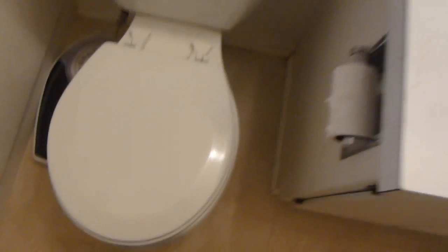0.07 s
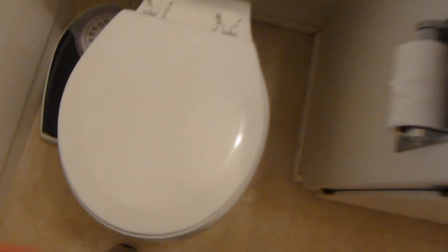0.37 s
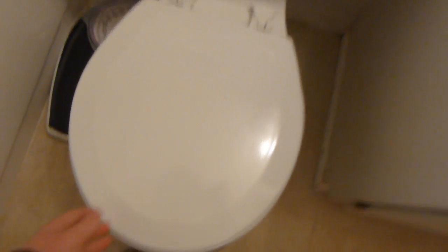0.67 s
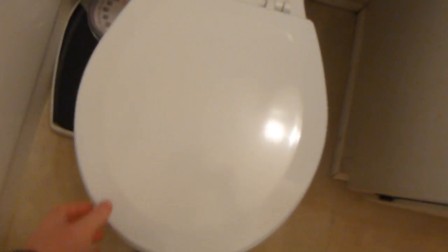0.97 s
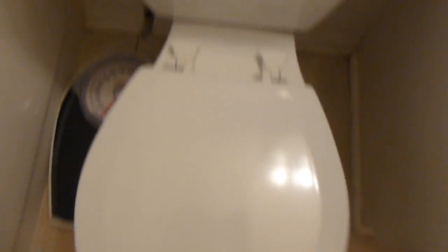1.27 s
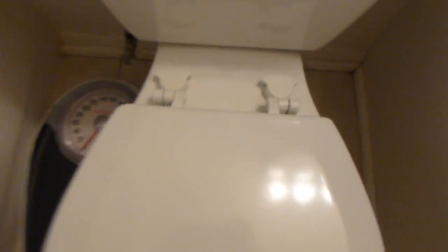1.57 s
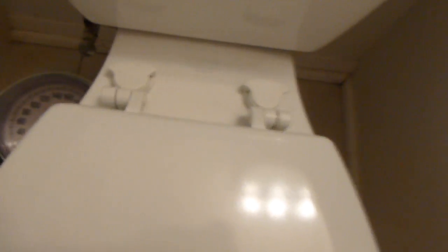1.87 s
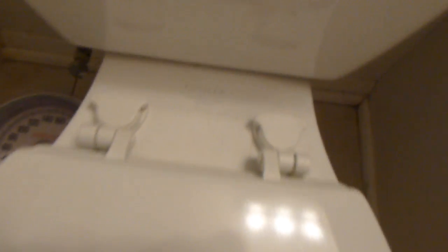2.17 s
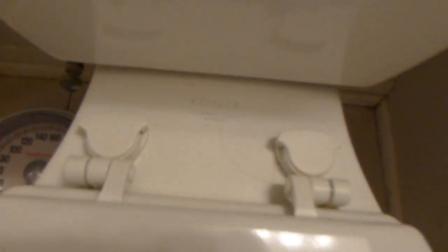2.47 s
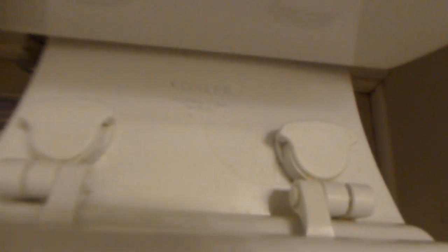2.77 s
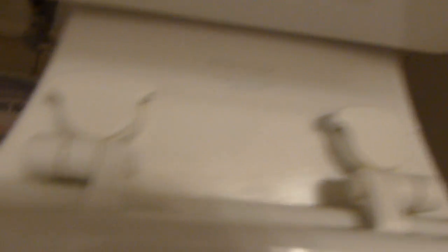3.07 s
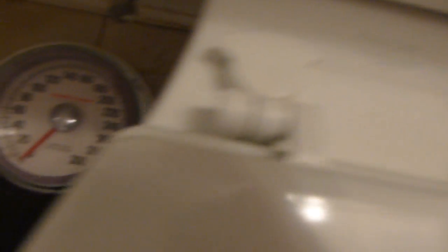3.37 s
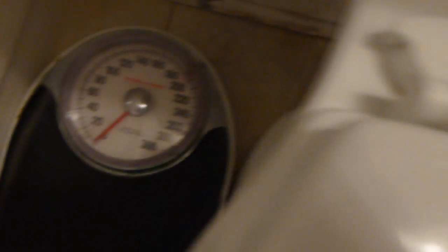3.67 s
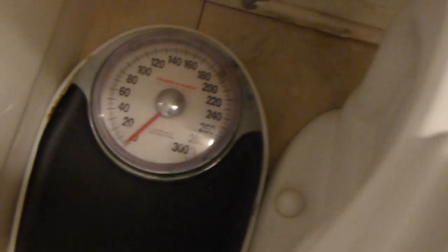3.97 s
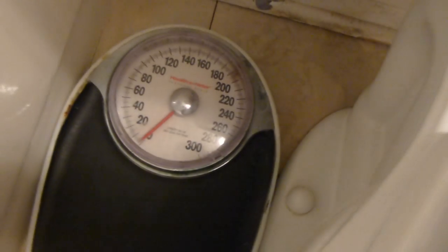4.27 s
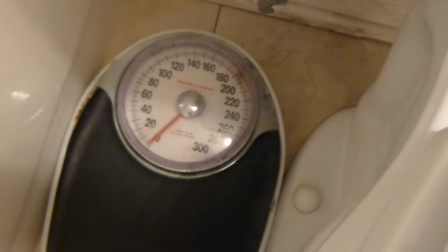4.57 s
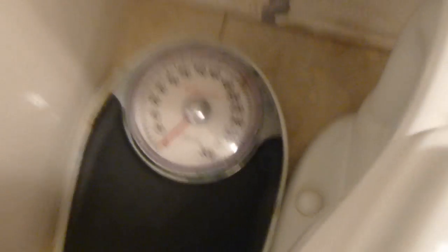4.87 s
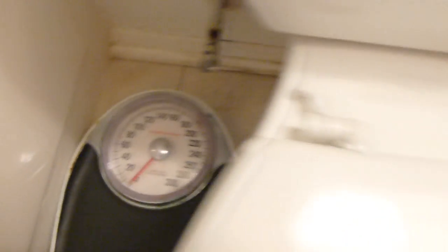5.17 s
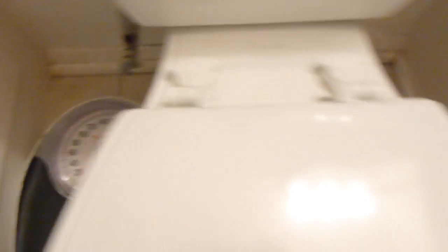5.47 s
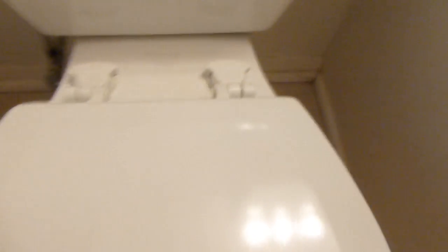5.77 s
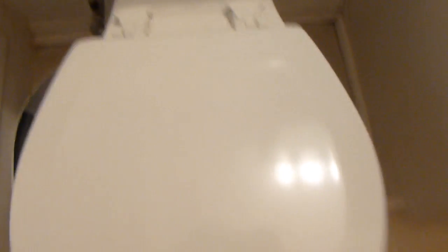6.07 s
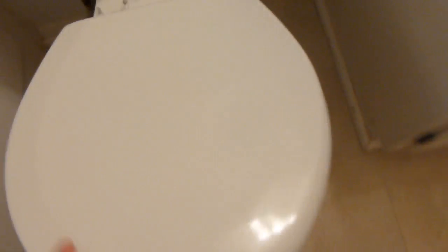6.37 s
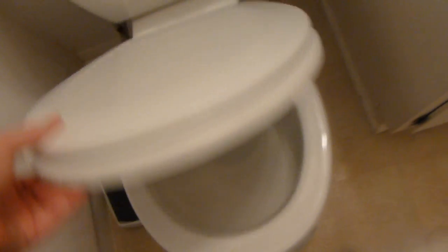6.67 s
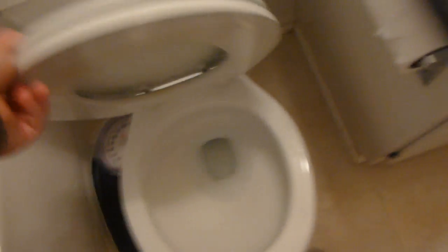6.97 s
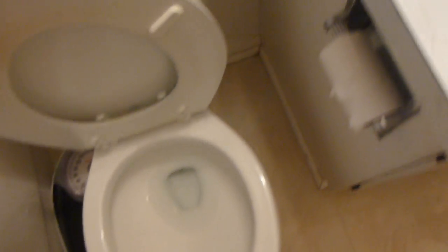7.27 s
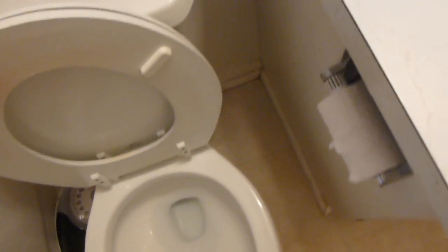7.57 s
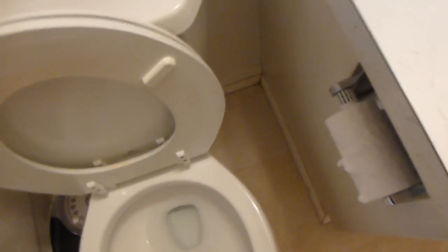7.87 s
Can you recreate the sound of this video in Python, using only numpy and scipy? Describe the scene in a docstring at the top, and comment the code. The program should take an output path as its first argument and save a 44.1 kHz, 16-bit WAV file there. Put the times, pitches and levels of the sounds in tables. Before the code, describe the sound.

After a brief silence, a faint low room noise and the close, soft rustle of a jacket begin at about 0.4 seconds. The cloth swells and fades throughout as someone moves around a small bathroom. Near 0.9 seconds a soft footstep thuds and faintly shakes the spring of a floor scale. Light bumps and small ticks follow between 1.3 and 2 seconds, then a faint step and tick near 3.1 seconds, and quiet rustling. A firmer, dull footfall lands at about 5.7 seconds. At 6.2 seconds the toilet seat and lid jolt in their hinges with a sharp, hollow, very quick double clack. More rustling and soft bumps follow as they swing up. At about 7.6 seconds the lid knocks hard against the china tank, by far the loudest sound, and tank and room ring for half a second. A faint tick and bump come near 8 seconds.

```python
"""Someone moves about a small bathroom, jacket rustling, with soft footfalls and small bumps.
Near 1 s a firm step shakes the spring of a floor scale; the cloth rustles on and off throughout.
At 6.2 s a hand picks up the toilet seat and lid together, which clack on their hinges.
They swing back, and at 7.6 s the lid knocks hard against the china tank and the room rings."""
import sys
import numpy as np
from scipy import signal
from scipy.fft import rfft, irfft, next_fast_len
from scipy.io import wavfile

SR = 44100
rng = np.random.default_rng(int(sys.argv[2]) if len(sys.argv) > 2 else 0)


def persist_wave(psi):
    """Save psi, clipped to +-1, as 16-bit WAV."""
    counts = np.round(np.clip(psi, -1, 1) * 32767).astype(np.int16)
    wavfile.write(sys.argv[1], SR, np.atleast_2d(counts).T)


N = 353241
TIME = np.arange(N) / SR

# Levels in a table are relative. A "fade" or "t60" is the time a sound takes to drop by 60 dB.
# Tone colour (how strong each pitch is) of the lid's first touch: f/Hz, level/dB
CRACK_COLOUR = [(60, -10), (500, 7), (2000, 0), (4500, 5), (7000, -11), (9300, -4.5), (15000, -34)]
# Short-lived tones of the lid: f/Hz, level/dB, fade/s
LID_TONES = [(275, -18, 0.037), (550, -3.5, 0.071), (660, -9.5, 0.059), (890, -6, 0.15), (1180, -10, 0.017),
             (1333, -8.5, 0.16), (1783, -6, 0.05), (2380, -15.5, 0.013), (2920, -31, 0.0091),
             (4080, -12.5, 0.017), (4900, -25, 0.022)]
# Long-ringing tones of tank, bowl and room: f/Hz, level/dB, fade/s
TANK_TONES = [(108, -39, .5), (205, -34, .45), (250, -35, .4), (285, -35, .4), (414, -26, .48),
              (457, -23, .44), (497, -28, .44), (533, -28, .44), (560, -26, .46), (586, -27, .48),
              (635, -29, .4), (671, -26, .48), (867, -23, .55), (887, -25, .44), (960, -21, .42),
              (969, -16, .44), (1060, -29, .44), (1092, -26, .44), (1109, -25, .44), (1282, -30, .44),
              (1346, -26, .42), (1585, -29, .4), (1626, -28, .38), (1790, -29, .4), (1943, -28, .3),
              (2026, -30, .38), (2260, -34, .4), (2907, -35, .36), (3375, -39, .4), (4040, -41, .44)]
# Colour of the knock's echo: f/Hz, level/dB
KNOCK_ECHO_COLOUR = [(70, -18), (110, -21), (220, -10), (360, -12), (540, -1), (770, -10), (930, 4),
                     (1350, -6.5), (1480, -7.5), (1850, -0.5), (2500, -18.5), (4300, -19), (6500, -33.5),
                     (12000, -60)]
# First bounces of the sound off tank, cabinet and wall: delay/s, level/dB
BOUNCES = [(.0042, -9), (0.0105, -6), (0.0146, -13)]
def lid_knock(touch_s=7.5684):
    """The lid hits the tank: a crack, the lid's own thud, then china and room ring on."""
    out = np.zeros((2, N))
    thud_s = touch_s + 0.00069   # the push is hardest just after the first touch
    crack = from_db(-12) * fade(0.013) * noise(CRACK_COLOUR, ROOM_LIKENESS, size=SR)
    lid = ring(LID_TONES)
    tank = from_db(10.5) * ring(TANK_TONES) * build_up(0.03)
    room = from_db(-8.5) * echo(KNOCK_ECHO_COLOUR, build_s=0.0033, stretch=1.0)
    add(out, touch_s, crack)
    add(out, thud_s, lid + tank + room)
    for delay_s, db in BOUNCES:
        add(out, thud_s + delay_s, from_db(db) * lid)
    return out * from_db([[.4], [-.4]])   # a little louder on the left


# Two clacks as the seat is lifted: t/s, ring level/dB, snap level/dB, echo level/dB
SEAT_CLACKS = [(6.2084, -7, -22, -33), (6.2248, -1, -23, -31)]
# Tones of the seat: f/Hz, level/dB, fade/s
SEAT_TONES = [(250.5, -27.5, 0.36), (419, -39, 0.23), (672, -43, .25), (1089, -38.5, 0.42),
              (1565, -36, 0.27), (1953, -41, 0.25), (2922, -36, 0.2), (3040, -28, 0.2), (3020, -47, .2),
              (3380, -50, 0.17), (3820, -26, 0.032)]
# Colours of the snap and of its echo: f/Hz, level/dB
SNAP_COLOUR = [(200, -5), (1000, -16), (2200, -6), (3000, -1), (4100, 1), (5500, -3), (7500, -9),
               (9800, -7), (15000, -10)]
SNAP_ECHO_COLOUR = [(70, -34), (150, -1), (400, -5), (1100, -1.5), (2100, -0.5), (3100, 6), (4300, 0),
                    (7000, -10), (9800, -0.5), (15000, -15)]
def seat_clacks():
    """Seat and lid jolt in their loose hinges: a sharp snap and a hollow ring."""
    out = np.zeros((2, N))
    for s, ring_db, snap_db, echo_db in SEAT_CLACKS:
        add(out, s, from_db(ring_db) * ring(SEAT_TONES))
        add(out, s, from_db(snap_db) * fade(0.021) * noise(SNAP_COLOUR, ROOM_LIKENESS, size=SR))
        add(out, s, from_db(echo_db) * echo(SNAP_ECHO_COLOUR, build_s=0.0044, stretch=0.94))
    return out


# Colours of the cloth's hiss, the folds' swish and the body's rumble: f/Hz, level/dB
HISS_COLOUR = [(1500, -12.5), (3200, -5), (3700, -4), (4120, 1), (4450, -3.5), (4900, 1.5), (6000, -1.5),
               (9500, -1.5), (13000, -4.5), (15500, -10.5)]
SWISH_COLOUR = [(100, -35), (350, -16), (750, 0), (1100, 1), (1700, 2), (2080, 1.5), (2400, -1.5),
                (2700, -0.5), (3300, -5), (5000, -11.5), (9000, -19.5)]
RUMBLE_COLOUR = [(60, -24), (100, -21), (140, -9.5), (300, -1.5), (400, 0.5), (480, 0), (620, -1.5),
                 (780, -0.5), (1100, -9.5), (3000, -32)]
# How alike left and right are for rustle and background: f/Hz, likeness (0 to 1)
CLOTH_LIKENESS = [(100, 0.74), (300, 0.57), (700, 0.24), (1400, 0.27), (3100, 0.64), (7000, 0.66),
                  (15000, 0.49)]
def jacket():
    """Countless tiny slips of cloth blur into a hiss; folds and body add the lower sounds."""
    sliding, folding, body = movements()
    hiss = from_db(2) * sliding * waver(depth_db=0.47, per_s=18)
    hiss = hiss * near_walls(noise(HISS_COLOUR, CLOTH_LIKENESS, size=N), echo_db=-9)
    swish = from_db(2.45) * folding * waver(depth_db=0.4, per_s=14)
    swish = swish * near_walls(noise(SWISH_COLOUR, CLOTH_LIKENESS, size=N), echo_db=-4.5)
    rumble = from_db(3) * body * waver(depth_db=1.16, per_s=28)
    rumble = rumble * noise(RUMBLE_COLOUR, CLOTH_LIKENESS, size=N)
    return hiss + swish + rumble


# The wearer bends, leans, straightens up, lifts the lid and lets it go:
# fastest at t/s, rise/s, fall/s, hiss level/dB, swish above hiss/dB, rumble above hiss/dB
MOVES = [ (.50, 0.2, 0.28, -40, -4, -11.5), (.98, 0.08, 0.14, -52, -3, -8),
         (1.46, .22, 0.28, -44, -4, -15.5), (1.75, 0.068, 0.41, -45, -4.5, -11.5),
         (2.99, 0.72, 0.23, -50.5, -10.5, -10), (3.23, 0.055, .06, -45.5, -10, -19),
         (3.45, .22, 0.38, -46.5, -9, -12.5), (4.069, 0.18, 0.093, -50.5, -9, -15.5),
         (4.30, 0.042, 0.19, -55, -2, -13), (4.64, 0.062, 0.058, -50, -6, -22),
         (4.96, 0.053, .04, -50, -5, -20), (5.04, .09, 0.59, -49.5, -8, -17.5),
         (5.73, 0.048, 0.075, -48, -0.5, -8), (5.98, 0.33, 0.51, -48.5, -3, -4.5),
         (6.48, 0.22, 0.18, -41, -5, -16.5), (6.759, 0.096, 0.15, -50.5, -3, -4),
         (6.98, 0.084, 0.28, -43.5, -3, -15), (7.24, .055, 0.062, -51.5, -3, 7),
         (7.475, 0.044, 0.14, -44.5, -1, -4), (8.00, 0.24, .14, -55.5, -4, -7)]
def movements():
    """How strong hiss, swish and rumble are over time: each move swells and dies away."""
    power = from_db([[-59.5], [-71], [-65.5]]) ** 2   # the faint rustle between moves
    for s, rise_s, fall_s, db, folds_db, body_db in MOVES:
        width_s = np.where(TIME < s, rise_s, fall_s)
        swell = np.exp(-((TIME - s) / width_s) ** 2)
        power = power + swell * from_db([[db], [db + folds_db], [db + body_db]]) ** 2
    return np.sqrt(power)


def waver(depth_db, per_s):
    """Loudness that wanders at random, as cloth catches and slips."""
    points = rng.standard_normal(1000)
    return from_db(depth_db * np.interp(TIME * per_s, np.arange(len(points)), points))


# Footfalls, duller when the press lasts longer: t/s, level/dB, press/s
FOOTFALLS = [(0.831, -41.5, 0.0022), (0.910, -34.5, 0.0018), (3.150, -40, 0.0053), (5.700, -38.5, 0.0052),
             (5.754, -27.5, 0.0054)]
# Tones of the floor and of the scale's spring: f/Hz, level/dB, fade/s
FLOOR_TONES = [(145.3, -6.5, 0.27), (200, -3, 0.049), (256.5, 1, 0.19), (318, -4, .08)]
SPRING_TONES = [(797, -53, .7), (1416, -49, .3), (1596, -38, .33), (1612, -45, .3)]
def footfalls():
    """A soft sole presses on the floor, which thuds; the second step shakes the scale."""
    out, thud = np.zeros((2, N)), ring(FLOOR_TONES)
    for s, db, press_s in FOOTFALLS:
        press = np.sin(np.pi * np.minimum(TIME[:SR] / press_s, 1)) ** 2
        add(out, s, from_db(db) * signal.fftconvolve(thud, press / press.sum())[:SR])
    add(out, FOOTFALLS[1][0], ring(SPRING_TONES) * build_up(0.046))
    return out


# Soft bumps and scuffs: t/s, level/dB, middle f/Hz, swell/s, fade/s
BUMPS = [(0.672, -39, 970, 0.012, 0.27), (0.930, -48, 290, 0.012, 0.35), (1.5, -37.5, 457, 0.0026, 0.14),
         (1.521, -44, 480, .003, 0.45), (3.330, -54, 510, 0.16, 1), (5.752, -42, 240, .012, 0.38),
         (5.756, -46, 900, 0.011, 0.54), (7.180, -48, 150, 0.027, .55), (7.415, -46, 460, 0.019, 0.34),
         (7.971, -43.5, 417, 0.012, .4)]
def bumps():
    """Soft bumps swell, then die away in the room."""
    out = np.zeros((2, N))
    for s, db, hz, swell_s, t60 in BUMPS:
        rise = np.minimum(TIME[:SR] / swell_s, 1)
        fall = np.minimum(fade(t60) * 1000 ** (swell_s / t60), 1)   # starts once the rise is over
        scuff = noise(hump(hz, edge_db=-19.5), ROOM_LIKENESS, size=SR)
        add(out, s, from_db(db) * rise * fall * scuff)
    return out


# Small ticks: t/s, level/dB, middle f/Hz
SMALL_TICKS = [(1.310, -44.5, 1400), (1.657, -41.5, 1670), (1.988, -43, 1490), (3.146, -43.5, 4100),
               (4.273, -54, 1893), (4.926, -51, 1900), (7.892, -52, 4000)]
def ticks():
    """Jacket and hinges give short ticks, each with a faint echo."""
    out = np.zeros((2, N))
    shape = fade(0.034) + from_db(-9) * fade(0.46)
    for s, db, hz in SMALL_TICKS:
        add(out, s, from_db(db) * shape * noise(hump(hz, edge_db=-16), ROOM_LIKENESS, size=SR))
    return out


# How long the room rings: f/Hz, fade/s
ROOM_FADE = [(100, 0.56), (400, 0.59), (1000, 0.61), (2000, 0.4), (4500, 0.47), (8000, 0.45), (15000, 0.16)]
# How alike left and right are for sound scattered by the room: f/Hz, likeness (0 to 1)
ROOM_LIKENESS = [(100, 0.89), (350, 1), (700, 0.95), (1400, 0.62), (4000, 0.77), (12000, 0.66)]
def echo(colour, build_s, stretch):
    """Bounces off the walls pile up quickly, then each octave dies at its own pace."""
    wash = rfft(noise(colour, ROOM_LIKENESS, size=SR))
    hz = np.fft.rfftfreq(SR, 1 / SR)
    octaves_hz = 125 * 2. ** np.arange(8)
    out = 0
    for centre, share in zip(octaves_hz, np.eye(len(octaves_hz))):
        band = irfft(wash * at_hz(np.c_[octaves_hz, share], hz), SR)
        out = out + band * fade(stretch * at_hz(ROOM_FADE, centre))
    return out * build_up(build_s)


def near_walls(x, echo_db, pieces=32):
    """Close, hard walls boost some pitches, and these shift as the wearer moves; power 1."""
    out, hop = np.zeros((2, N)), N // pieces
    for start in range(0, N - hop, hop):
        piece = x[:, start:start + 2 * hop]
        piece = piece * np.hanning(2 * hop)[:piece.shape[1]]
        paths = rng.standard_normal(SR // 5) * fade(.16)[:SR // 5]
        paths *= from_db(echo_db) / np.linalg.norm(paths)
        paths[0] = 1   # the sound that arrives without bouncing
        add(out, start / SR, signal.fftconvolve(piece, paths[None], axes=1))
    return rms_one(out)


# Colour of the steady background: f/Hz, level/dB
BACKGROUND_COLOUR = [(25, 8), (50, -2), (85, 0.5), (140, 5.5), (250, 11.5), (450, 3), (900, -25),
                     (15000, -37)]
def background():
    """The faint, low noise of the room and recorder."""
    return from_db(-65.5) * noise(BACKGROUND_COLOUR, CLOTH_LIKENESS, size=N)


def ring(tones):
    """The fading tones of a struck object; neighbours swing in opposite directions."""
    return sum((-1) ** k * from_db(db) * np.sin(2 * np.pi * hz * TIME[:SR]) * fade(t60)
               for k, (hz, db, t60) in enumerate(tones))


def noise(colour, likeness, size):
    """Stereo noise of a given colour and left-right likeness; power 1."""
    padded = next_fast_len(size)
    hz = np.fft.rfftfreq(padded, 1 / SR)
    shared, opposite = rfft(rng.standard_normal((2, padded)))
    alike = np.clip(at_hz(likeness, hz), 0, 1)
    pair = np.sqrt(1 + alike) * shared + np.sqrt(1 - alike) * opposite * [[1], [-1]]
    coloured = pair * from_db(at_hz(colour, hz)) * (hz > 20)
    return rms_one(irfft(coloured, padded)[:, :size])


def hump(hz, edge_db):
    """A colour with one broad peak around a pitch."""
    return [(hz / 8, 2 * edge_db), (hz / 2, edge_db / 2), (hz, 0),
            (hz * np.sqrt(2), edge_db / 6), (hz * 4, 2 * edge_db), (hz * 16, 4 * edge_db)]


def fade(t60):
    """One second of dying away."""
    return np.exp(-np.log(1000) * TIME[:SR] / t60)


def build_up(rise_s):
    """One second of rising from 0 towards 1, as ringing takes a moment to grow."""
    return 1 - np.exp(-TIME[:SR] / rise_s)


def from_db(db):
    """Turn decibels into a multiplier."""
    return 10 ** (np.asarray(db) / 20)


def rms_one(x):
    """Scale a sound to an average power of 1."""
    return x / np.sqrt(np.mean(x ** 2) + 1e-20)


def at_hz(points, hz):
    """Read between a table's rows, with octaves evenly spaced."""
    known_hz, values = np.transpose(points)
    return np.interp(np.log(hz + 1e-9), np.log(known_hz), values)


def add(out, s, sound):
    """Mix a sound in at s seconds."""
    start = int(s * SR)
    out[:, start:start + sound.shape[-1]] += sound[..., :N - start]


def turn_down(x, threshold_db, share, attack_s, release_db_per_s):
    """The recorder turns itself down on loud sound and recovers quickly."""
    keep = np.exp(-1 / (attack_s * SR))
    power = signal.lfilter([1 - keep], [1, -keep], np.mean(x ** 2, axis=0))
    cut_db = share * np.maximum(10 * np.log10(power + 1e-12) - threshold_db, 0)
    recovery_db = release_db_per_s * TIME
    held_db = np.maximum.accumulate(cut_db + recovery_db) - recovery_db
    return x * from_db(-signal.lfilter([1 - keep], [1, -keep], held_db))


def scene():
    """All the sounds the person makes, together."""
    return lid_knock() + seat_clacks() + jacket() + footfalls() + bumps() + ticks()


def record(dry):
    """The microphone opens late, loses deep bass and top treble, and dips and overloads on the knock."""
    start_s, offset = .356, -.0032   # the offset shifts the whole wave slightly below zero
    lowest_hz, highest_hz = 98, 15650
    thin = signal.sosfilt(signal.butter(6, lowest_hz, "high", fs=SR, output="sos"), dry)
    live = (thin + background() + offset) * (TIME >= start_s)
    dipped = turn_down(live, threshold_db=-17, share=0.59, attack_s=0.0076, release_db_per_s=77)
    rounded = .98 * dipped / (1 + dipped ** 8) ** (1 / 8)   # overload flattens the tallest peaks
    return signal.sosfilt(signal.ellip(10, .1, 80, highest_hz, fs=SR, output="sos"), rounded)


dry = scene()
out = record(dry)
persist_wave(out)
```